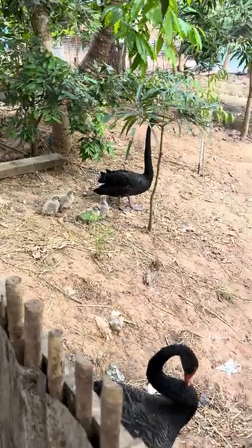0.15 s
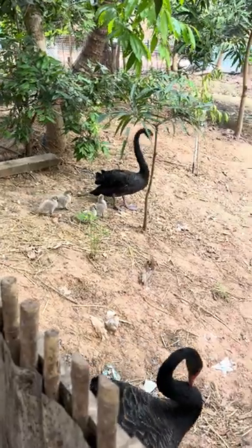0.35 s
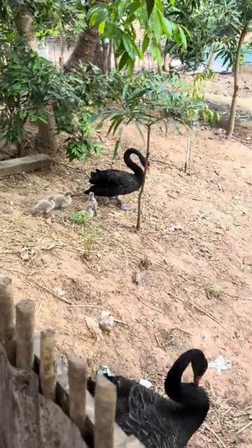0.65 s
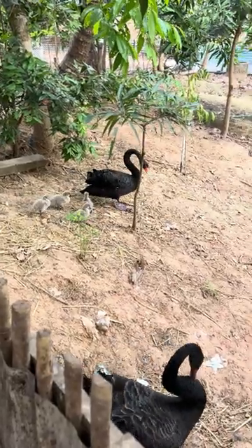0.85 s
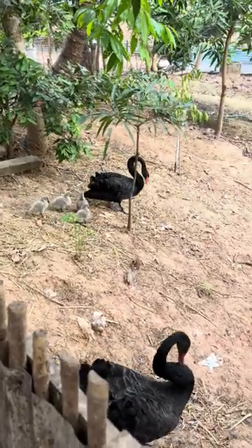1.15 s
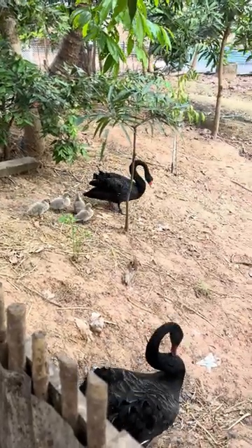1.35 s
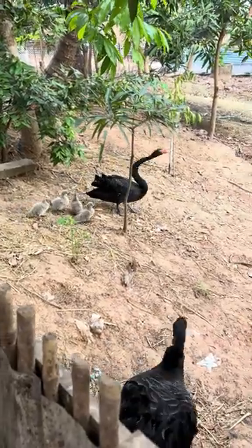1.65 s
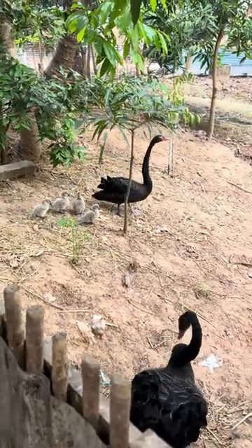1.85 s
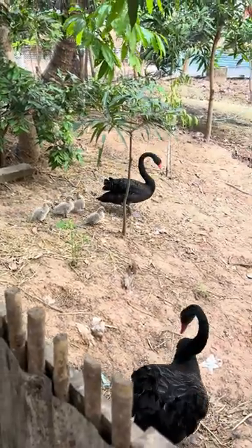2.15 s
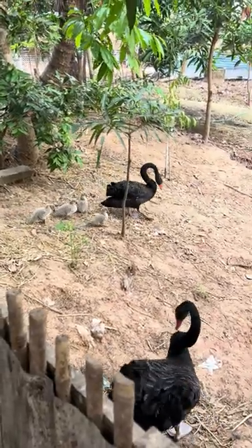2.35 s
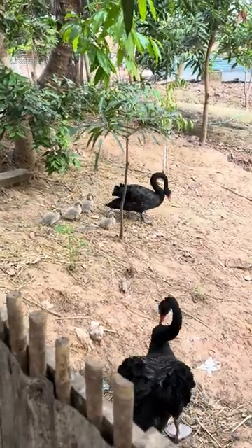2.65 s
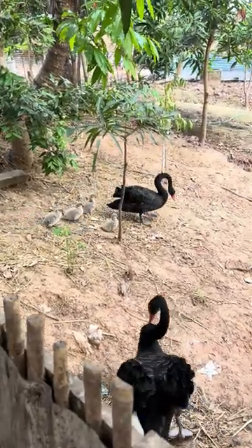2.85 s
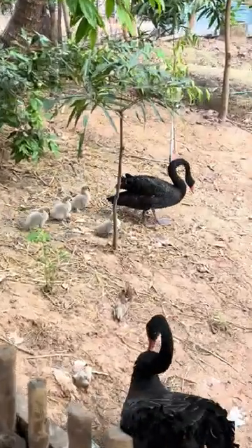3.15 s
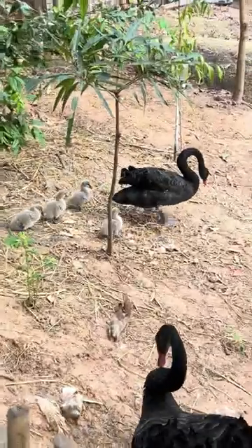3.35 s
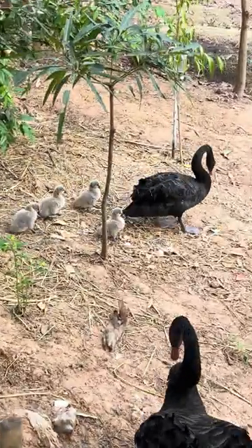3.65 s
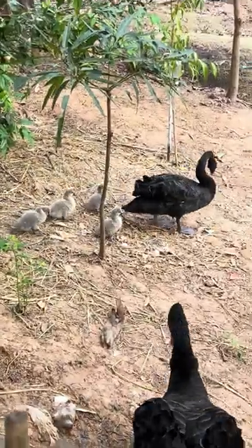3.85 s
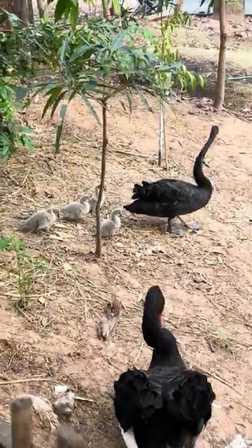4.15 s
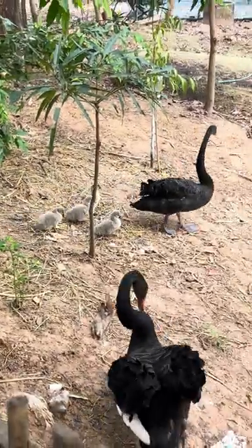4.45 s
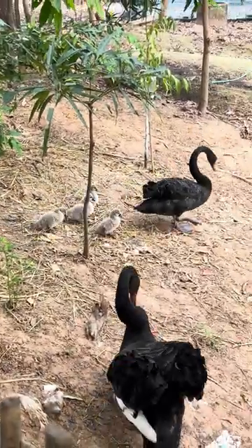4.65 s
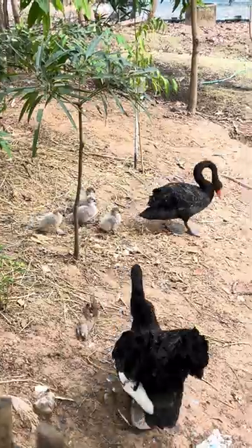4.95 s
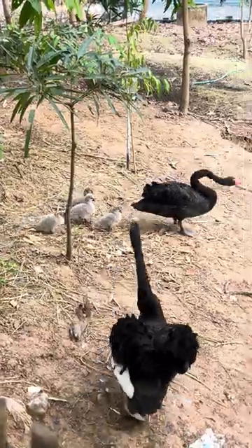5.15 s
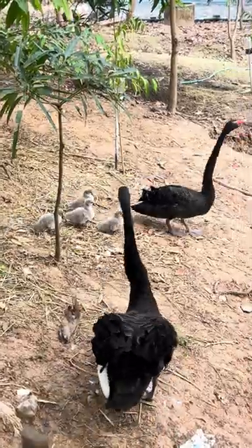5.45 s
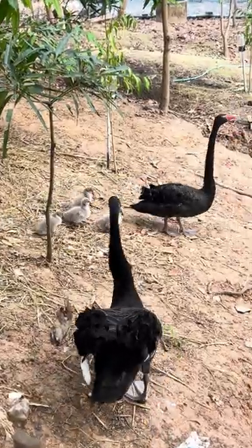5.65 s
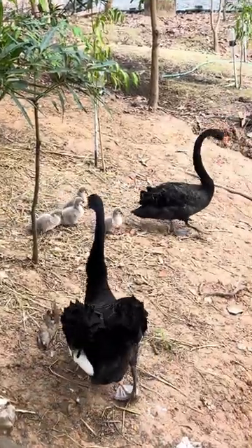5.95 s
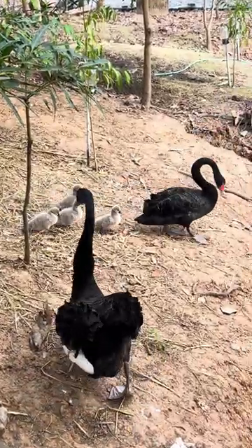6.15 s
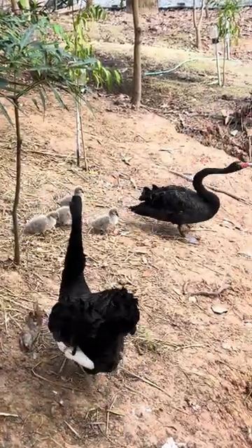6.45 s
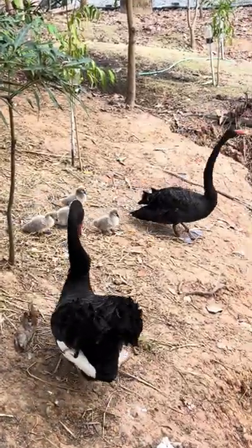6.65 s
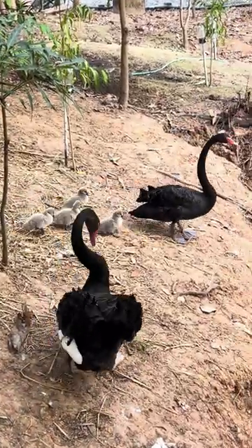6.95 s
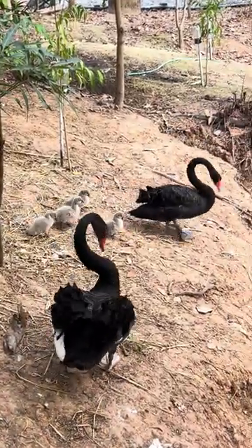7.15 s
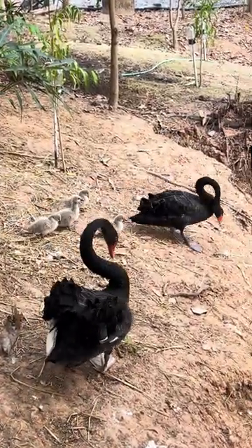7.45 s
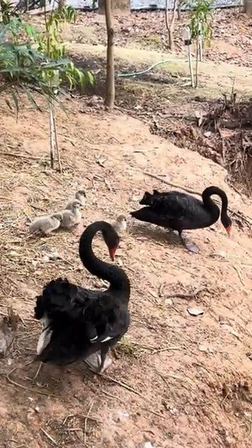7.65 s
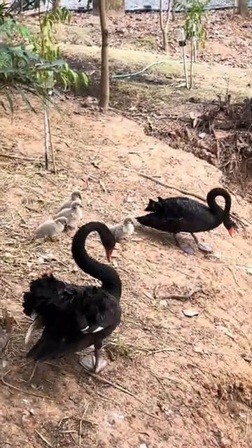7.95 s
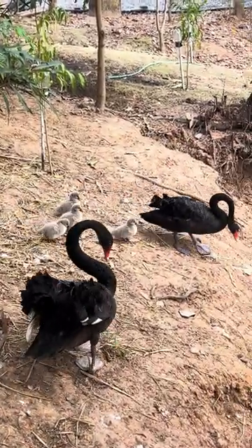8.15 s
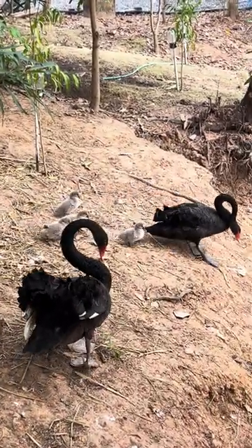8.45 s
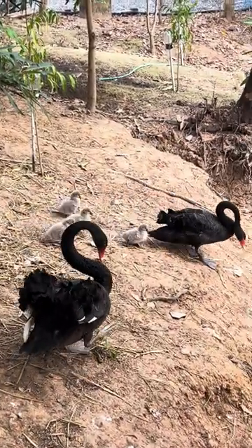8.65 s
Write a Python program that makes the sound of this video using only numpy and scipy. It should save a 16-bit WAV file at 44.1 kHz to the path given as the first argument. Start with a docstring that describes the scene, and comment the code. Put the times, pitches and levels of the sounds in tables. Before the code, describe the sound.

An outdoor yard with faint low rumble and thin high hiss that flickers and swells, sharply around 6.1 and 7.2 s. Cygnets peep throughout in fast high glides and two-crested warbles, strong near 1.9 s. A faint repeating distant note opens the scene; thin far birds follow occasionally. At 0.4 s an adult whistles briefly, then honks hoarsely at 0.6, 1.35 and 2.4-2.6 s, the voice breaking into whistled tones, leaning left with diffuse echo. A dry tap lands at 2.8 s; fainter ones at 0.9, 6.4 and 8.5 s. Short falling bugles come at 3.5, 3.8, 4.8, 4.95, 5.4, 5.8 and 6.2 s, some rough and fluttering, with soft grunts between. Higher peeps cluster around 6.5-6.8 s. A clear longer bugle at 7.0 leads to a fluttering one at 7.2, then grunts at 7.3 and 7.5 s. Peeps continue until a last bugle at 8.7 s.

```python
"""Bare earth of a farm yard: two black swans and their cygnets.
The adults bugle in short falling whistles (arched near-sines, some fluttering), and give hoarse honks
and soft grunts (rough pulses through throat resonances); the cygnets peep in fast sine glides.
Distant birds call thinly, and bills and feet tap on dry litter (short ringing noise bursts).
Shaped noise makes a faint low rumble under it all and a high hiss that flickers and swells."""
import sys
import numpy as np
from scipy import signal
from scipy.fft import rfft, irfft
from scipy.io import wavfile

SR = 44100
rng = np.random.default_rng(int(sys.argv[2]) if len(sys.argv) > 2 else 0)


def master(y):
    """Save y as 16-bit WAV."""
    cut = np.clip(np.atleast_2d(y).T, -1, 1)
    pcm = np.round(cut * 32767)  # scale
    wavfile.write(sys.argv[1], SR, pcm.astype(np.int16))


N = 388521
T = np.arange(N) / SR
FREQS = np.fft.rfftfreq(N, 1 / SR)

# throat colour of honks and grunts: freq_hz, gain_db
THROAT = [(260, -41), (430, 4.5), (540, 2), (720, 5), (900, 7), (1150, 0), (1500, -8.5), (1900, 3),
          (2300, -5), (5000, -60)]
# rasp colour of honks and grunts: freq_hz, gain_db
RASP = [(1700, -11.5), (2200, -6), (2700, 2), (3300, 2), (4500, -4.5), (5500, -5.5), (7000, -14),
        (10000, -17.5), (15000, -32)]
# how far a source on the left shows as a level difference: freq_hz, share
PAN_SHARE = [(220, 0), (400, 0.57), (1400, 1), (1900, 0)]
PUSH_DB_PER_OCTAVE = 10   # harder blowing is both higher and louder


def from_db(db):
    """Decibels to gain."""
    return 10 ** (np.asarray(db) / 20)


def rms_one(x):
    """Scale to unit power."""
    return x / np.sqrt(np.mean(x ** 2) + 1e-20)


def at_hz(points, hz):
    """Read a table on a log-frequency axis."""
    table_hz, value = np.transpose(points)
    return np.interp(np.log(np.maximum(hz, 1)), np.log(table_hz), value)


def colour(x, points):
    """Filter by a spectrum in dB."""
    size = x.shape[-1]
    gain = from_db(at_hz(points, np.fft.rfftfreq(size, 1 / SR)))
    return irfft(rfft(x) * gain, size)


def drift(t, rate_hz):
    """Random wander: straight lines between normal draws of spread 1."""
    knots_s = np.arange(0, 9, 1 / rate_hz)
    return np.interp(t - t[0], knots_s, rng.standard_normal(len(knots_s)))


def span(start_s, end_s):
    """Sample indices and times of a stretch."""
    at = np.arange(max(int(start_s * SR), 0), min(int(end_s * SR), N))
    return at, T[at]


def fade(t, edge_s):
    """Soft start and stop."""
    from_edge_s = np.minimum(t - t[0], t[-1] - t)
    return np.sin(np.pi / 2 * np.clip(from_edge_s / edge_s, 0, 1)) ** 2


def envelope(t, attack_s, release_s):
    """Attack, hold and release."""
    rise = np.sin(np.pi / 2 * np.clip((t - t[0]) / attack_s, 0, 1))
    fall = np.sin(np.pi / 2 * np.clip((t[-1] - t) / release_s, 0, 1))
    return (rise * fall) ** 2


def bell(x, half_width):
    """A hump of height 1 around 0."""
    return 1 / (1 + (x / half_width) ** 2)


def phase_of(hz):
    """Running phase of a moving pitch."""
    return 2 * np.pi * np.cumsum(hz) / SR


def moving_resonance(x, hz, width_hz):
    """A single resonance whose centre follows a curve: shift down, smooth, shift back."""
    turn = np.exp(1j * phase_of(hz))
    r = np.exp(-np.pi * width_hz / SR)
    return 2 * np.real(turn * signal.lfilter([1 - r], [1, -r], x / turn))


def background(gain_db, rumble_db, rumble_waver_db, hiss_db, hiss_waver_db, hiss_grain_db):
    """Shaped noise: far rumble that wavers a little, and a faint high hiss that flickers and swells."""
    # yard spectrum before trims: freq_hz, level_db_per_hz
    yard = [(20, -121), (35, -83), (55, -72.5), (100, -74), (160, -86), (260, -93.5), (500, -97),
            (1200, -101.3), (2200, -104), (3800, -101.3), (5500, -105.3), (8000, -110.9), (13000, -109.7),
            (15500, -110.8)]
    # left-right likeness: freq_hz, likeness_0_to_1
    likeness = [(100, 1), (250, 0.92), (600, 0.3), (1500, 0.71), (2500, 1), (15000, 1)]
    # hiss swells: middle_s, half_width_s, rise_db
    swells = [(0.051, 0.068, 6), (1.1, 0.077, 5), (2.352, 0.45, 6), (3.42, 0.14, 8.5), (3.8, 0.2, 7.5),
              (5.2, 1, 3), (6.13, 0.075, 14.5), (6.41, 0.023, 5), (6.62, 0.11, 9.5), (7.19, 0.029, 17),
              (8.53, .05, 7.5), (8.79, .04, 7)]
    # rumble course, used relative to its mean: time_s, level_db
    rumble_course = [(0.0, -47.5), (1.25, -54), (1.49, -51), (3.7, -52), (4.32, -51), (5.47, -54),
                     (7.75, -53.5), (8.71, -51), (8.81, -61)]

    noise = rfft(rng.standard_normal((2, N)))
    mid, side = noise * from_db(at_hz(yard, FREQS) + gain_db) * np.sqrt(SR / 4)
    mid = mid / np.sqrt(1 + (33 / np.maximum(FREQS, 1)) ** 8)   # the deepest rumble falls away
    alike = np.clip(at_hz(likeness, FREQS), 0, 1)
    air = np.sqrt(1 + alike) * mid + np.sqrt(1 - alike) * side * [[1], [-1]]
    air = air * from_db(np.outer([.5, -.5], 4.1 * at_hz(PAN_SHARE, FREQS)))

    low = at_hz([(250, 1), (500, 0)], FREQS)
    high = at_hz([(4000, 0), (8000, 1)], FREQS)
    swell_db = sum(db * np.exp(-((T - middle) / width) ** 2) for middle, width, db in swells)
    time_s, course_db = np.transpose(rumble_course)
    course_db = np.interp(T, time_s, course_db - course_db.mean())
    rumble_level_db = rumble_db + course_db + rumble_waver_db * drift(T, 3.8)
    rumble = irfft(air * low, N) * from_db(rumble_level_db)
    flicker_db = hiss_waver_db * drift(T, 16) + hiss_grain_db * drift(T, 300)
    hiss = irfft(air * high, N) * from_db(hiss_db + swell_db + flicker_db)
    return rumble + irfft(air * (1 - low - high), N) + hiss


def far_birds(waver, count=4):
    """Faint sine calls from beyond the yard, broken by scatter; one low falling note repeats."""
    # thin whistles: start_s, length_s, first_pitch_hz, last_pitch_hz, level_db
    far_calls = [(0.932, 0.24, 3650, 3250, -62), (2.14, 0.28, 4280, 4220, -69),
                 (2.667, 0.096, 4700, 3430, -62), (3.922, 0.12, 3770, 3770, -67.5),
                 (7.817, 0.13, 3660, 3600, -71)]
    # partials of the repeated note: first_pitch_hz, level_db
    far_partials = [(330, -59.5), (1340, -60.5)]
    start_s, period_s, length_s, fall_share = 0.00189, .163, 0.079, 0.205

    out = np.zeros(N)
    repeated = [(start_s + k * period_s, length_s, hz, hz * (1 - fall_share), db)
                for k in range(count) for hz, db in far_partials]
    for start, length, first_hz, last_hz, db in repeated + far_calls:
        at, t = span(start, start + length)
        hz = np.linspace(first_hz, last_hz, len(t)) * (1 + waver * drift(t, 304))
        # many paths add at random
        scatter = drift(t, first_hz / 30) + 1j * drift(t, first_hz / 30)
        out[at] += from_db(db) * np.real(scatter * np.exp(1j * phase_of(hz))) * fade(t, 0.014)
    return out


def taps(t60_s, crack, gain_db):
    """Bills and feet on dry litter: decaying noise rings one broad resonance, a small crack on top."""
    # start_s, peak_db (before gain_db), ring_hz
    tap_list = [(0.898, -56.5, 401), (2.802, -47.5, 620), (6.392, -56.5, 902), (8.486, -61.5, 1810)]
    out = np.zeros(N)
    for start, db, hz in tap_list:
        at, t = span(start, start + .06)
        burst = rng.standard_normal(len(t)) * from_db(-60 * (t - start) / t60_s)
        knock = signal.lfilter(*signal.iirpeak(hz, 1.5, fs=SR), burst) + crack * burst
        out[at] += from_db(db + gain_db) * knock / np.abs(knock).max()
    return out


def peep(t, hz, db, octave_db=-21):
    """A cygnet's thin whistle, strongest as it glides through the resonance of its bill."""
    # freq_hz, gain_db
    peep_colour = [(1500, -4), (2000, -6), (2600, -2), (3200, -1.5), (3800, -10), (5000, -8), (8000, -14)]
    phase = phase_of(hz * (1 + 0.00056 * drift(t, 495)))
    level = from_db(db + at_hz(peep_colour, hz) + 2.1 * drift(t, 75))
    tone = np.sin(phase) + from_db(octave_db) * np.sin(2 * phase)
    return np.sqrt(2) * level * tone * fade(t, 0.0044)


def cygnets(warble_db, chirp_db, peep_db, top_loss_db=14):
    """Two-crested warbles, slow chirps, and quick arches whose voice thins out at the top."""
    # levels in these tables are before trim and colour
    # start_s, length_s, crest_1_hz, crest_2_hz, dip_place_0_to_1, crest_1_db, crest_2_db
    warble_list = [(.005, 0.14, 3215, 2890, 0.55, -46, -42.5), (0.5, 0.14, 3010, 2990, 0.5, -40.5, -40.5),
                   (1.274, 0.13, 3104, 3120, 0.41, -46, -38), (1.857, 0.13, 3880, 3305, 0.58, -39, -30.5),
                   (1.992, 0.12, 3190, 3070, 0.66, -43.5, -34.5),
                   (4.553, 0.15, 3470, 2710, 0.8, -44.5, -34), (7.65, 0.12, 2620, 2440, 0.5, -60, -50),
                   (8.183, 0.14, 2820, 2574, 0.73, -48.5, -42.5)]
    # start_s, length_s, top_pitch_hz, level_db
    chirp_list = [(0.438, 0.092, 2560, -50), (2.151, 0.03, 2200, -45.5), (3.065, 0.1, 3300, -48.5),
                  (3.249, 0.12, 3750, -47.5), (3.451, 0.1, 3900, -48), (3.607, 0.048, 2650, -51),
                  (4.176, 0.086, 2520, -45), (4.245, 0.058, 1920, -53.5), (4.346, 0.13, 3150, -59.5),
                  (4.447, .118, 3200, -43.5), (5.441, 0.12, 2730, -46), (5.759, 0.14, 3130, -45),
                  (6.719, 0.083, 2270, -62), (6.773, 0.075, 2550, -49), (6.825, .16, 3050, -50),
                  (6.968, 0.068, 2360, -49), (7.766, 0.058, 1695, -54), (8.15, 0.13, 2600, -51.5),
                  (8.28, 0.095, 2520, -48)]
    # start_s, length_s, top_pitch_hz, level_db
    peep_list = [(0.168, 0.1, 4180, -54.5), (0.354, 0.11, 4070, -51), (1.079, 0.096, 4350, -52),
                 (1.244, 0.099, 4430, -54.5), (2.404, 0.077, 4450, -44.5), (2.949, 0.096, 4240, -53),
                 (3.078, 0.12, 4430, -56), (3.25, 0.11, 4300, -55), (3.825, 0.097, 4480, -51),
                 (3.982, 0.12, 4640, -55), (4.121, 0.14, 4340, -55), (4.333, 0.11, 4360, -51),
                 (4.738, 0.11, 4350, -51), (5.613, 0.12, 4230, -56), (6.458, .102, 5340, -56),
                 (6.514, 0.11, 5480, -52), (6.604, .105, 5240, -55.5), (6.778, 0.095, 5400, -49),
                 (7.07, 0.145, 4340, -44), (7.381, 0.12, 4930, -54), (7.548, 0.11, 4730, -53.5),
                 (7.708, 0.11, 5120, -55), (8.076, 0.1, 4600, -53.5), (8.293, 0.11, 4900, -56)]
    warble_foot_hz, dip_share = 1692, .86   # pitch at both ends; dip as a share of the second crest
    crest_1_place, crest_2_place = 0.49, .42   # shares of the stretches before and after the dip
    # a skew under 1 rises faster than it falls; rounding under 1 flattens the top
    chirp_foot_hz, chirp_skew, chirp_rounding = 1600, .8, 0.76
    peep_foot_hz, peep_skew, peep_rounding = 1500, .74, .9

    out = np.zeros(N)
    for start, length, first_hz, second_hz, dip, first_db, second_db in warble_list:
        at, t = span(start, start + length)
        turns = [0, crest_1_place * dip, dip, dip + crest_2_place * (1 - dip), 1]
        step = np.interp((t - start) / length, turns, np.arange(len(turns)))
        # the glide slows at both crests and the dip
        inner = abs(step - 2) < 1.5
        eased = step - np.sin(2 * np.pi * step) / (2 * np.pi) * inner
        pitches_hz = [warble_foot_hz, first_hz, dip_share * second_hz, second_hz, warble_foot_hz]
        hz = np.interp(eased, np.arange(len(turns)), pitches_hz)
        db = np.interp(step, [1, 3], [first_db, second_db])
        out[at] += peep(t, hz, db + warble_db + PUSH_DB_PER_OCTAVE * np.log2(hz / hz.mean()))

    for start, length, top_hz, db in chirp_list:
        at, t = span(start, start + length)
        along = np.linspace(0, 1, len(t))
        arch = np.abs(np.sin(np.pi * along ** chirp_skew)) ** chirp_rounding
        hz = chirp_foot_hz + (top_hz - chirp_foot_hz) * arch
        out[at] += peep(t, hz, db + chirp_db + PUSH_DB_PER_OCTAVE * np.log2(hz / hz.mean()))

    for start, length, top_hz, db in peep_list:
        at, t = span(start, start + length)
        along = np.linspace(0, 1, len(t))
        arch = np.abs(np.sin(np.pi * along ** peep_skew)) ** peep_rounding
        hz = peep_foot_hz + (top_hz - peep_foot_hz) * arch
        out[at] += peep(t, hz, db + peep_db - top_loss_db * arch ** 4)
    return out


def rough_pulses(t, hz, rough, growl_hz=176, growl_depth=0.49):
    """Uneven pulses of the syrinx, shaken by a slower growl that adds side tones; air on each opening."""
    neck_echo, neck_decay_s = 1, 0.0061   # echo strength against the direct pulse
    phase = phase_of(hz * (1 + .025 * rough * drift(t, 260) + .03 * rough * drift(t, 25)))
    pulses = rms_one(sum(np.cos(k * phase + rng.uniform(0, 2 * np.pi)) for k in range(1, 33)))
    beat = phase_of(growl_hz * (1 + .15 * rough * drift(t, 150)))
    growl = rms_one((1 + growl_depth * rough * np.cos(beat)) ** 2)
    air = rng.standard_normal(len(t)) * (1 + .5 * np.cos(phase))
    source = (pulses + 1.1 * rough ** 3 * air) * growl
    # reflections along the long neck smear the pulses and dapple the spectrum
    lag_s = T[:500]
    neck = rng.standard_normal(len(lag_s)) * np.exp(-lag_s / neck_decay_s)
    neck = neck / np.sqrt(np.sum(neck ** 2))
    return rms_one(source + neck_echo * signal.fftconvolve(source, neck)[:len(t)])


def grunts(sag, rasp_db, crackle_db):
    """Short quiet notes in the low register that swell, sag in pitch and fade; the rough ones crackle."""
    # start_s, length_s, pitch_hz, level_db (before rasp and filter), roughness (about 0 to 1)
    grunt_list = [(3.499, 0.11, 497, -48.5, 0.83), (3.851, 0.084, 471, -46.5, 0.53),
                  (4.106, 0.06, 435, -50.5, 0.3), (4.537, 0.07, 452, -53.5, 0.46),
                  (4.751, 0.057, 561, -49, 0.68), (5.424, 0.041, 435, -48.5, 0.24),
                  (5.596, 0.0923, 443, -52.5, 1.02), (5.775, 0.071, 433, -47, 0.88),
                  (7.339, 0.12, 384, -46.5, 0.91), (7.511, 0.114, 381.8, -47.5, 0.9)]
    attack_share, release_share = 0.24, 0.49   # of a grunt's length
    low_pass = signal.butter(2, 3400, fs=SR, output="sos")
    out = np.zeros(N)
    for start, length, hz, db, rough in grunt_list:
        at, t = span(start, start + length)
        sagging_hz = hz * (1 - sag * (t - start) / length)
        source = rough_pulses(t, sagging_hz, rough, growl_hz=152.5, growl_depth=0.4)
        rasp = from_db(rasp_db) * rms_one(colour(source, RASP))
        voice = signal.sosfilt(low_pass, rms_one(colour(source, THROAT)) + rasp)
        level = from_db(db + crackle_db * rough * drift(t, 226))
        out[at] += level * voice * envelope(t, attack_share * length, release_share * length)
    return out


def windpipe(x):
    """Narrow resonances of the long windpipe ring on top of the direct sound."""
    # freq_hz, width_hz, gain_db
    resonances = [(720, 25, -9), (763, 69, 6.5), (1120, 160, 0), (1494, 9.2, -2), (1570, 41, 17.5),
                  (1730, 16, 0), (1840, 51, -13), (2500, 39, -2), (4100, 64, -18)]
    out = x.copy()
    for hz, width_hz, db in resonances:
        out += from_db(db) * signal.lfilter(*signal.iirpeak(hz, hz / width_hz, fs=SR), x)
    return out


def honks(pitch_hz, rough, note_db, focus=0.4):
    """Hoarse honks in which the voice breaks between a rough low register and whistled notes."""
    # start_s, length_s, release_s (scaled below), body_db, rasp_db (at the start), throat_hz (mid-honk)
    honk_list = [(0.596, 0.23, 0.16, -46.5, -41, 990), (1.341, 0.2204, 0.13, -42, -40, 1010),
                 (2.419, 0.1173, 0.036, -43.5, -37, 1090), (2.52, 0.089, 0.075, -44, -45.5, 1100),
                 (2.605, 0.059, 0.043, -61, -46, 940)]
    # whistled notes: start_s, length_s, pitch_hz, fall_share, level_db (before note_db)
    honk_notes = [(0.616, .1, 824, -0.068, -47.5), (0.617, 0.063, 1411, 0.013, -45.5),
                  (.712, 0.053, 1078, 0.026, -49), (1.336, 0.063, 1069, 0.07, -38.5),
                  (1.366, .052, 1406, -0.0051, -38.5), (2.418, 0.062, 1069, 0.023, -36.5),
                  (2.456, 0.078, 880.5, 0.0049, -36), (2.524, 0.05, 1058, 0.037, -45)]
    honk_attack_s, rasp_attack_s = .014, 0.038
    throat_sag = 0.17   # share by which the throat resonance sinks
    wane_db_per_s = 26.5   # the rasp dies away as the air runs out
    note_attack_s, note_release_s = 0.012, 0.021

    out = np.zeros(N)
    for start, length, release, body_db, rasp_db, throat_hz in honk_list:
        at, t = span(start, start + length)
        falling_hz = pitch_hz * np.linspace(1.02, .97, len(t))
        source = windpipe(rough_pulses(t, falling_hz, rough))
        low = rms_one(colour(source, THROAT))
        centre_hz = throat_hz * (1 + throat_sag * np.linspace(.5, -.5, len(t)))
        low = rms_one(low + focus * rms_one(moving_resonance(low, centre_hz, width_hz=120)))
        body = from_db(body_db) * low * envelope(t, honk_attack_s, 0.78 * release)
        # the rasp needs more pressure: it comes later and leaves sooner
        rasp_level = from_db(rasp_db - wane_db_per_s * (t - start))
        rasp = rasp_level * rms_one(colour(source, RASP)) * envelope(t, rasp_attack_s, 1.02 * release)
        out[at] += (body + rasp) * from_db(0.73 * drift(t, 177))

    for start, length, hz, fall, db in honk_notes:
        at, t = span(start, start + length)
        phase = phase_of(hz * (1 - fall * (t - start) / length + 0.014 * drift(t, 456)))
        note = np.sin(phase) + 0.11 * np.sin(2 * phase)
        level = np.sqrt(2) * from_db(db + note_db + 1.1 * drift(t, 275))
        out[at] += level * note * envelope(t, note_attack_s, note_release_s)
    return out


def bugles(jitter, flutter_jitter, air_db, flutter_air_db, grain_db):
    """A near-sine whistle on a pitch arch, thin harmonics; a second, slow vibration pulses and roughens it."""
    # start_s, length_s, top_pitch_hz, time_to_top_s, arch_half_width_s, fall_share, fundamental_db,
    # fundamental_wane_db, harmonic_2_db, upper_harmonics_db, bill_resonance_hz, flutter_hz,
    # flutter_depth_0_to_1 (before its growth along the call)
    bugle_list = [(0.419, 0.078, 1176, 0.0074, 0.058, 0.098, -35.5, 28, -52, -52.5, 4700, 125.5, 0.33),
                  (3.518, 0.11, 1044, 0.04, 0.068, 0.33, -36, 9.5, -51, -51.5, 3180, 113, 0.24),
                  (3.769, 0.096, 1074, 0.03, 0.062, 0.24, -33, 6.5, -49.5, -57, 4400, 112, .08),
                  (4.78, 0.21, 1052, 0.044, 0.096, 0.33, -41.5, 5, -39, -39, 3700, 94, 0.22),
                  (4.957, 0.079, 1103, 0.02, 0.054, 0.17, -31, 16, -48, -53.5, 3270, 102, 0.59),
                  (5.409, 0.1, 1189, 0.028, 0.055, 0.2, -31, 9.5, -43.5, -49, 3920, 121, 0.24),
                  (5.8, 0.231, 1081, 0.048, 0.074, .3, -36.5, 0.5, -34.5, -36.5, 3460, 86.8, 0.59),
                  (6.196, 0.073, 1235, 0.0086, 0.0617, 0.174, -33.5, 1.5, -44, -49, 3930, 106, 0.35),
                  (7.001, 0.24, 948.6, 0.049, 0.063, 0.23, -29.5, 46.5, -48, -45, 4300, 97, 0.05),
                  (7.217, 0.11, 1166, 0.027, 0.058, 0.28, -29, 24.5, -50.5, -48.5, 4140, 103.6, .65),
                  (8.699, .099, 1083, 0.031, 0.081, 0.3, -37, 2, -50, -42, 4800, 113, 0)]
    # upper harmonics: freq_hz, gain_db
    bill = [(2400, 1), (3200, -6.5), (4300, -9), (5300, -11), (6500, -17.5), (8000, -25), (12000, -32)]
    # turbulence: freq_hz, gain_db
    air_colour = [(500, 4), (1500, -6), (2300, 0.5), (3500, 1), (5000, 2.5), (7000, -4.5), (14000, -15.5)]
    attack_s, release_s = 0.015, 0.015
    # effort crests just after the pitch; overtones sink as it slackens
    effort_lag_s, effort_half_width_s, slack_max_db = 0.0068, 0.05, 24
    flutter_onset, flutter_swing = .55, 0.02   # share of flutter at the start; pitch swing at full depth
    bill_peak_db, bill_half_width_hz = 7.5, 1800   # lift of the overtones near the bill resonance

    out = np.zeros(N)
    for (start, length, top_hz, crest, arch, fall, db, wane_db, second_db, upper_db,
         bill_hz, flutter_hz, depth) in bugle_list:
        at, t = span(start, start + length)
        along = np.linspace(0, 1, len(t))
        since_top = t - start - crest
        hz = top_hz * (1 - fall * (1 - bell(since_top, arch)))
        slack_db = slack_max_db * (1 - bell(since_top - effort_lag_s, effort_half_width_s))

        flutter = np.clip(depth * (flutter_onset + along), 0, min(1.61 * depth, 1))
        beat = phase_of(flutter_hz * (1 + 0.051 * drift(t, 78)))
        swing = flutter_swing * flutter * np.cos(beat - .6)
        shake = (jitter + flutter_jitter * flutter) * drift(t, 900)
        phase = phase_of(hz * (1 + swing + shake))

        first = from_db(db - wane_db * along ** 3)
        voice = first * np.sin(phase) + from_db(second_db - slack_db) * np.sin(2 * phase)
        for k in range(3, 13):
            bill_db = at_hz(bill, k * hz) + bill_peak_db * bell(k * hz - bill_hz, bill_half_width_hz)
            level = from_db(upper_db - slack_db + bill_db + grain_db * drift(t, 62.6))
            voice += level * np.sin(k * phase)

        # turbulence rides on the harmonics and roughens the call
        air = rms_one(colour(rng.standard_normal(len(t)) * (1 + np.cos(phase)), air_colour))
        flutter_air = from_db(upper_db - slack_db + flutter_air_db) * flutter
        voice += (first * from_db(air_db) + flutter_air) * air
        pulsing = (1 + flutter * np.cos(beat)) / np.sqrt(1 + flutter ** 2 / 2)
        out[at] += np.sqrt(2) * voice * pulsing * envelope(t, attack_s, release_s)
    return out


def ground_bounces(x, share):
    """Earth, fence and trunks return a few early copies that break up a gliding note."""
    out = x.copy()
    for lag in (rng.uniform(0.0018, 0.02, 5) * SR).astype(int):
        out[lag:] += share * x[:-lag]
    return out / np.sqrt(1 + 5 * share ** 2)


def placed(x, left_db):
    """Spread a source over both channels; the level difference shows in the low middle."""
    return irfft(rfft(x) * from_db(np.outer([.5, -.5], left_db * at_hz(PAN_SHARE, FREQS))), N)


def yard_echo(x, t60_s, dull_hz):
    """Diffuse scatter from fence, trees and sheds: decaying, dulled noise tails, different in each ear."""
    t = T[:SR // 2]
    tail = rng.standard_normal((2, len(t))) * from_db(-60 * t / t60_s) * np.clip(t / 0.0021, 0, 1)
    tail = signal.sosfilt(signal.butter(1, dull_hz, fs=SR, output="sos"), tail)
    tail = tail / np.sqrt(np.sum(from_db(-120 * t / t60_s)))
    return signal.fftconvolve(x[None], tail, axes=1)[:, :N]


def scene():
    """Bugles, honks, grunts and peeps, with their echoes, in the open yard."""
    whistles = bugles(jitter=0.0029, flutter_jitter=0.06, air_db=-26, flutter_air_db=-17.5, grain_db=3.5)
    hoarse = honks(pitch_hz=435, rough=0.88, note_db=0.5)
    soft = grunts(sag=0.16, rasp_db=-8, crackle_db=2.5) + taps(t60_s=0.043, crack=0.025, gain_db=13.5)
    young = ground_bounces(cygnets(warble_db=-4.8, chirp_db=-2.4, peep_db=0.3), share=0.17)
    clear = whistles + soft + young + far_birds(waver=0.026)
    direct = placed(clear, left_db=5.5) + placed(hoarse, left_db=16.5)
    clear_echo = from_db(-14) * yard_echo(clear, t60_s=0.4, dull_hz=5000)
    hoarse_echo = from_db(-2.5) * yard_echo(hoarse, t60_s=0.5, dull_hz=6300)
    air = background(gain_db=1.15, rumble_db=0.0, rumble_waver_db=0.3,
                     hiss_db=-1.66, hiss_waver_db=1.2, hiss_grain_db=2.43)
    return direct + clear_echo + hoarse_echo + air


def record(dry):
    """The two microphones differ in phase, more so toward the treble; the top is cut."""
    # freq_hz, left_lead_rad
    pair_phase = [(0, 0), (1000, -.35), (1600, -.35), (2600, 2.1), (3800, .9), (5000, 1.4), (5900, 3.1),
                  (8000, 6.3), (10200, 9.4), (12600, 12.6), (14800, 15.7), (22050, 25)]
    cutoff_hz = 15800
    lead_rad = np.interp(FREQS, *np.transpose(pair_phase))
    pair = irfft(rfft(dry) * np.exp(1j * np.outer([.5, -.5], lead_rad)), N)
    return signal.sosfilt(signal.ellip(10, .1, 80, cutoff_hz, fs=SR, output="sos"), pair)


dry = scene()
out = record(dry)
master(out)
```